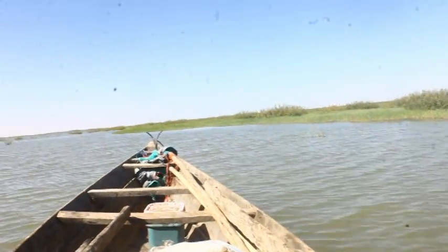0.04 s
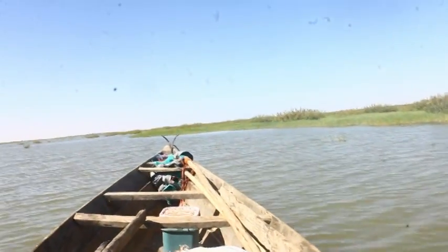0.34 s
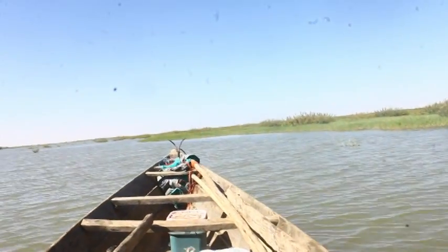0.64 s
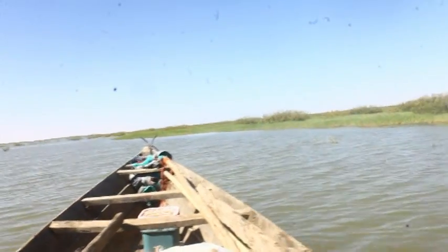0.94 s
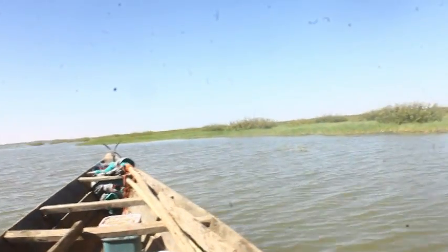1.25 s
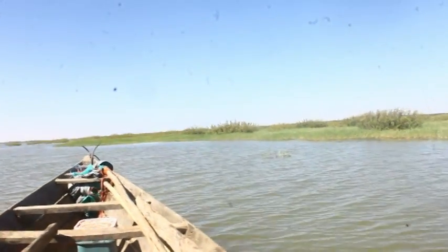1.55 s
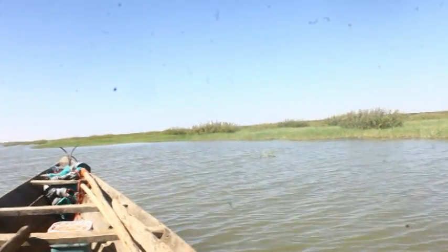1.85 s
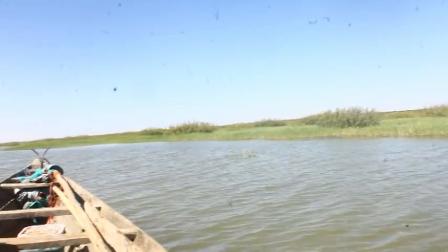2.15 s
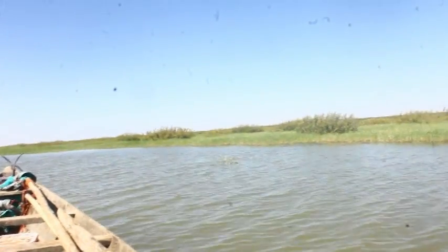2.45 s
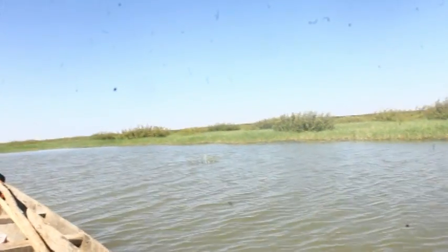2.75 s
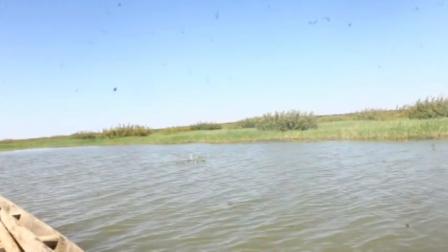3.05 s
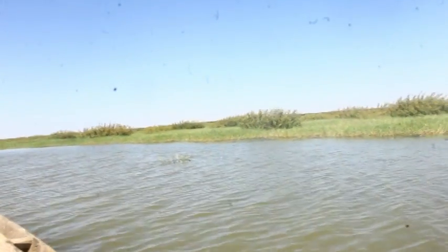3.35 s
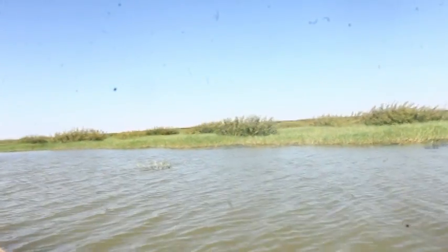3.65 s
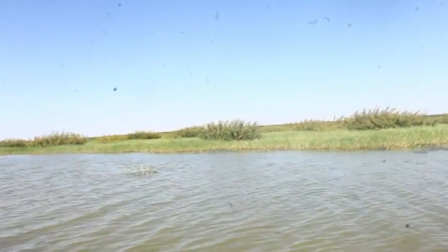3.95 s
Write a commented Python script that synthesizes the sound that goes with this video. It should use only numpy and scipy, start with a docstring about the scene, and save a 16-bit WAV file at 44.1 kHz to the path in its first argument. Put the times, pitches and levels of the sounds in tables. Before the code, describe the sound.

Wind gusts buffet the microphone with sharp knocks, over lapping water and faint birds.

```python
"""Wind gusts buffet a microphone in a wooden boat on a wide river and overload it in sharp knocks.
Turbulence sweeping past the microphone rumbles, and single eddies thump, crack and snap against it.
Between the gusts ripples slap and swish along the hull and bubbles ring over the wash of open water.
Far birds whistle, swoop and peep in gliding tones; these and a rasp are scattered by the reeds."""
import sys
import numpy as np
from scipy import signal
from scipy.fft import rfft, irfft
from scipy.io import wavfile
from scipy.ndimage import map_coordinates

SR = 44100
rng = np.random.default_rng(int(sys.argv[2]) if len(sys.argv) > 2 else 0)


def waveform_to_disk(signal):
    """Save audio, clipped to [-1, 1], as 16-bit WAV at the path in sys.argv[1]."""
    frames = np.transpose(np.atleast_2d(signal))
    scaled = np.clip(frames, -1, 1) * 32767
    samples = np.round(scaled).astype(np.int16)
    wavfile.write(sys.argv[1], SR, samples)


N = 176400
T = np.arange(N) / SR

# pressure spectrum of turbulence: (frequency [Hz], relative density [dB])
TURBULENCE_SPECTRUM = [(15, -27), (30, -18), (60, -7), (110, 1.5), (200, -0.5), (320, -8), (480, -10.5),
                       (700, -22.5), (1000, -30), (2000, -56), (4000, -67), (9000, -88)]
# spectrum of the crack in an eddy's core: (frequency [Hz], relative density [dB])
CRACK_SPECTRUM = [(200, -14.5), (500, 18.5), (900, 3.5), (1500, -8.5), (3000, -29), (6000, -39.5),
                  (15000, -48.5)]


def amp(db):
    """Amplitude ratio of a level in decibels."""
    return 10 ** (np.asarray(db) / 20)


def unit(x):
    """Normalisation to rms 1."""
    return x / np.sqrt(np.mean(x ** 2) + 1e-20)


def gain_at(spectrum, hz):
    """Gain of a spectrum, interpolated in decibels over log frequency."""
    f, db = np.transpose(spectrum)
    return amp(np.interp(np.log(hz + 1), np.log(f + 1), db))


def noise(gain, size=N):
    """Spectral shaping: white noise weighted by gain(frequency), at rms 1."""
    return unit(irfft(rfft(rng.standard_normal(size)) * gain(np.fft.rfftfreq(size, 1 / SR)), size))


def drift(hz, size=N):
    """Random modulation: noise low-passed at hz."""
    return noise(lambda f: 1 / (1 + (f / hz) ** 4), size)


def band(f, hz, octaves):
    """Gaussian passband over log frequency."""
    return np.exp(-.5 * (np.log2((f + 1) / hz) / octaves) ** 2)


def add(mix, start, sound):
    """Superposition of a sound on the mix from a start time in seconds."""
    at = round(start * SR)
    sound = sound[max(-at, 0):]
    part = mix[max(at, 0):][:len(sound)]
    part += sound[:len(part)]


def gate(start, end, rise_s=.00505, fall_s=.009):
    """Sustained envelope with exponential flanks."""
    return np.exp(-np.maximum(start - T, 0) / rise_s - np.maximum(T - end, 0) / fall_s)


def ring_down(t, decay_s, rise_s=.00053):
    """Transient envelope: a quick onset, then exponential damping."""
    return (1 - np.exp(-t / rise_s)) * np.exp(-t / decay_s)


def wind():
    """Convected turbulence: a stronger gust sweeps eddies past faster, and its strongest lumps crackle."""
    # stretches of turbulent wind: (start [s], end [s], level [dB])
    gusts = [(0, 0.027, -17), (.03, 0.264, -21), (.255, 0.311, -27), (0.347, .40, -27.5),
             (0.413, 0.514, -21), (0.546, .68, -32.5), (0.684, 0.905, -21.5), (.91, 1.333, -24),
             (1.448, 1.583, -38.5), (1.632, 1.68, -26), (1.685, 1.79, -17), (1.812, 1.88, -19),
             (1.868, 1.926, -32), (2.019, 2.1, -29.5), (2.1, 2.153, -22.5), (2.213, 2.241, -29),
             (2.316, 2.366, -22), (2.41, 2.419, -28.5), (2.524, 2.56, -30.5), (2.904, 2.963, -40),
             (3.016, 3.06, -16), (3.114, 3.15, -36.5), (3.155, 3.163, -22), (3.36, 3.677, -39.5),
             (3.861, 3.989, -38.5), (3.992, 4.021, -21)]
    lull_db, lump_db, sputter_db = -45.5, 3.6, -41.5
    gust = np.max([amp(db) * gate(start, end) for start, end, db in gusts], 0) + amp(lull_db)
    lumps = unit(amp(lump_db * np.clip(drift(hz=60), -2.5, 1.5)))
    force = gust * lumps
    speed = (unit(force) + .11) ** .08
    eddies = noise(lambda f: gain_at(TURBULENCE_SPECTRUM, f))
    rumble = force * map_coordinates(eddies, [np.cumsum(speed)], order=3, mode="wrap")
    sputter = amp(sputter_db) * unit(force ** 2.3) * noise(lambda f: gain_at(CRACK_SPECTRUM, f))
    return rumble + sputter


def river():
    """Open water: a broadband wash and a Poisson rain of tiny drops, each a damped oscillator."""
    # spectrum of the wash: (frequency [Hz], relative density [dB])
    wash_spectrum = [(20, -9.5), (150, 9), (400, -3.5), (900, -9.5), (1600, -12.5), (3000, -19),
                     (5000, -23), (8000, -28.5), (10500, -36), (15500, -38.5)]
    # strength of the drops by pitch: (frequency [Hz], relative level [dB])
    drop_spectrum = [(700, -8.5), (1800, 0), (4500, -6), (8000, -13), (14000, -17.5)]
    drops_per_s, spread_db, decay_cycles = 300, 5, 2.5
    wash_db, swell_db, drops_db = -46.5, .8, -57.5
    drops, t = np.zeros(N), np.arange(1024) / SR
    pitches = np.geomspace(800, 13000, num=24)
    for hz in pitches:
        hits = rng.random(N) < drops_per_s / len(pitches) / SR
        strength = amp(spread_db * np.minimum(rng.exponential(1, N), 3.5))
        ring = np.sin(2 * np.pi * hz * t) * np.exp(-t * hz / decay_cycles)
        drops += gain_at(drop_spectrum, hz) * signal.oaconvolve(hits * strength, ring)[:N]
    wash = noise(lambda f: gain_at(wash_spectrum, f)) * amp(wash_db - swell_db * drift(hz=22))
    return wash + amp(drops_db) * unit(drops)


def buffets():
    """Pressure pulses: each eddy is a swing or two, quickest at its core, where it cracks."""
    # eddies striking the microphone:
    # (time [s], relative level [dB], nominal length [s], nominal pitch [Hz], relative crack level [dB])
    eddies = [(0.042, -7, 0.0034, 234.2, -33), (0.058, -1.5, 0.0054, 264.1, -30),
              (0.117, -15.5, 0.013, 340.5, -27.5), (0.14, -7.5, 0.0063, 259.5, -37),
              (0.165, -8.5, 0.0045, 215.7, -56.5), (0.186, -4.5, 0.005, 320.1, -25.5),
              (0.203, -8, 0.0022, 362, -52), (0.228, -7, 0.0045, 372.2, -29),
              (0.407, -23, 0.006, 330.7, -47), (0.425, -7.5, 0.0047, 265.2, -28.5),
              (0.448, -12, 0.006, 288, -40), (0.53, -9, 0.0049, 385.4, -30.5),
              (0.72, -7.5, 0.0032, 276, -33), (0.737, -8.5, 0.0058, 321.9, -24.5),
              (0.763, -14, 0.0045, 378.5, -31), (0.831, -18, 0.0047, 257, -42.5),
              (0.837, -9.5, 0.0033, 254.3, -42), (0.884, -7.5, 0.0033, 256, -65),
              (0.896, -12, 0.0045, 308.6, -47), (0.954, -18, 0.0051, 291.5, -37),
              (0.977, -7.5, 0.0026, 254.3, -49), (1.004, -8.5, 0.0041, 250, -37),
              (1.041, -11.5, 0.0047, 393.5, -30), (1.073, -13, 0.0029, 246, -40.5),
              (1.092, -11, 0.0049, 341, -33), (1.113, -16, 0.0052, 246.6, -48),
              (1.168, -12.5, 0.005, 233, -32.5), (1.18, -12.5, 0.005, 344.4, -36),
              (1.202, -11, 0.0039, 250, -58), (1.241, -18, 0.006, 200, -58),
              (1.268, -22, 0.0039, 152.5, -49), (1.313, -10.5, 0.0036, 335, -44),
              (1.331, -13, 0.0052, 214, -54), (1.477, -16.5, 0.0037, 301.3, -38),
              (1.521, -18.5, 0.0027, 261, -62), (1.568, -22.5, 0.0029, 327.3, -40.5),
              (1.655, -18.5, 0.0068, 220, -33.5), (1.689, -9.5, 0.004, 246, -35.5),
              (1.73, -6, 0.0038, 305.2, -26.5), (1.764, -16, 0.0041, 485, -45),
              (1.782, -9, 0.0065, 260, -30), (1.836, -5, 0.0039, 280.7, -32),
              (1.874, -14, 0.0048, 255.6, -44), (2.063, -10, 0.0027, 322.6, -53),
              (2.124, -5, 0.0034, 419.1, -20), (2.143, -10.5, 0.0038, 220.6, -51),
              (2.217, -7.5, 0.0036, 288.6, -34), (2.224, -10, 0.0033, 359, -37),
              (2.24, -18.5, 0.0039, 332.7, -36), (2.331, -12.5, 0.0032, 273, -32.5),
              (2.367, -19, 0.0055, 277.6, -47.5), (2.533, -11, 0.0038, 222.8, -50),
              (2.544, -12.5, 0.0028, 254.3, -38), (2.554, -15, 0.0031, 314, -31),
              (2.592, -10.5, 0.0027, 390.6, -45), (2.813, -24.5, 0.0037, 233.7, -59),
              (3.025, -11, 0.0052, 221.4, -60), (3.054, -4, 0.0058, 414.1, -18.5),
              (3.066, -23, 0.008, 546, -29.5), (3.162, -9, 0.0047, 292, -42),
              (3.259, -25, 0.0043, 448.7, -48), (3.484, -23.5, 0.0022, 396, -44),
              (3.51, -31.5, 0.0031, 383, -44), (3.612, -26, 0.0072, 400.6, -47),
              (3.681, -21.5, 0.0024, 298, -46), (3.874, -21.5, 0.0033, 339, -56),
              (3.912, -19, 0.0064, 294.8, -39.5)]
    roughness, crack_width_s = .6, .00091
    out, t = np.zeros(N), np.arange(-2048, 2048) / SR
    core = np.exp(-.5 * (t / crack_width_s) ** 2)
    core_rms = np.sqrt(np.mean(core ** 2))
    for time, db, length, hz, crack_db in eddies:
        envelope = 1 / np.cosh(np.clip(t / (.439 * length), -20, 20))
        pitch = hz * (1 + .5 * (envelope ** 2 - .7))
        cycles = np.cumsum(pitch) / SR + rng.random()
        turbulence = noise(lambda f: gain_at(TURBULENCE_SPECTRUM, f), len(t))
        swing = np.sqrt(2) * np.sin(2 * np.pi * cycles) + roughness * turbulence
        crack = core_rms * unit(core * noise(lambda f: gain_at(CRACK_SPECTRUM, f), len(t)))
        add(out, time + t[0], amp(db + 1.5) * envelope * swing + amp(crack_db + 17) * crack)
    # the microphone port sheds the slowest pressure swings
    return signal.sosfilt(signal.butter(2, 60, "highpass", fs=SR, output="sos"), out)


def snaps():
    """Impulses: the hardest eddies break in one pressure spike, with all frequencies in phase."""
    # breaking eddies: (time [s], peak level [dB])
    breaks = [(.0575, -32), (.186, -19), (.738, -18), (1.0415, -30), (2.124, -18), (3.054, -22)]
    # spectrum of the spike: (frequency [Hz], relative density [dB])
    spectrum = [(500, -20.5), (1500, -2), (3000, -5.5), (6000, -9.5), (10000, -13), (15500, -36)]
    out, size = np.zeros(N), 256
    spike = np.roll(irfft(gain_at(spectrum, np.fft.rfftfreq(size, 1 / SR))), size // 2)
    for time, db in breaks:
        add(out, time - size / 2 / SR, amp(db) * spike / spike.max())
    return out


def bird_note(hz, db, waver_depth=.005, flutter_db=2.5):
    """A pure tone on a pitch contour, with slight random frequency and amplitude modulation."""
    waver = 1 + waver_depth * drift(hz=150, size=16384)[:len(hz)]
    flutter = flutter_db * drift(hz=70, size=16384)[:len(hz)]
    envelope = np.sqrt(2 * abs(np.sin(np.linspace(0, np.pi, len(hz)))))
    return amp(db + flutter) * envelope * np.sin(2 * np.pi * np.cumsum(hz * waver) / SR)


def whistles():
    """Frequency modulation: thin bird whistles with vibrato hold, climb as they swell, then drop."""
    # calls: (start [s], length [s], low pitch [Hz], top pitch [Hz], mid-climb [fraction], level [dB])
    calls = [(0.128, 0.19, 7950, 8730, 0.63, -65.5), (0.411, 0.26, 7420, 8800, 0.41, -62),
             (0.916, 0.23, 7900, 9070, 0.57, -59), (1.125, 0.18, 7950, 9300, 0.84, -62),
             (1.579, 0.16, 7370, 8550, .52, -56.5), (3.671, 0.23, 7300, 9030, 0.33, -65)]
    climb_share, swell_db, drop_s, drop_hz = .15, 4.5, .033, 1670
    vibrato_depth_hz, vibrato_rate_hz = 90, 11
    out = np.zeros(N)
    for start, length, low, top, mid_climb, db in calls:
        progress = np.linspace(0, 1, round(length * SR))
        climb = .5 + .5 * np.tanh((progress - mid_climb) / climb_share)
        drop = np.maximum(1 - (1 - progress) * length / drop_s, 0) ** 2
        vibrato = vibrato_depth_hz * np.sin(2 * np.pi * vibrato_rate_hz * (progress - mid_climb) * length)
        pitch = low + (top - low) * climb + vibrato - drop_hz * drop
        add(out, start, bird_note(pitch, db + swell_db * (climb - 1)))
    return out


def swoops():
    """Exponential sweeps: quick bird chirps, nearly all falling."""
    # chirps: (start [s], length [s], first pitch [Hz], last pitch [Hz], level [dB])
    chirps = [(0.233, 0.032, 6330, 4770, -54), (0.249, 0.022, 4140, 3350, -53.5),
              (0.507, 0.043, 7000, 4420, -49.5), (0.523, 0.047, 6400, 4090, -51),
              (.755, 0.1, 7170, 3680, -56), (0.793, 0.053, 6750, 4000, -50),
              (1.135, 0.022, 7150, 5130, -65), (1.177, 0.023, 5900, 4100, -60.5),
              (1.222, 0.044, 4966, 3880, -57.5), (1.572, 0.039, 4700, 6080, -57),
              (1.623, 0.041, 6370, 3770, -56), (1.741, 0.019, 8700, 6700, -54),
              (1.927, 0.031, 6250, 5260, -57.5), (1.984, .025, 6200, 4970, -65),
              (2.491, .115, 7560, 3320, -52.5), (3.448, 0.069, 7240, 4110, -55.5),
              (3.476, 0.044, 6550, 4653, -64), (3.663, 0.043, 6510, 5140, -64),
              (3.882, 0.027, 7040, 3900, -52), (3.892, 0.045, 6700, 3780, -55)]
    out = np.zeros(N)
    for start, length, first, last, db in chirps:
        progress = np.linspace(0, 1, round(length * SR))
        pitch = first * (last / first) ** progress
        add(out, start, bird_note(pitch, db) * np.sin(np.pi * progress))
    return out


def plops():
    """Bubble resonance: each bubble at the hull rings as a damped sine, rising very slightly."""
    # bubbles: (time [s], peak level [dB], pitch [Hz], decay time [s])
    bubbles = [(.278, -40.5, 2110, .002), (0.652, -31, 2033, 0.0045), (.848, -17, 1301, 0.00071),
               (2.032, -30, 1214, 0.0044), (2.674, -29, 2030, 0.0013), (3.208, -32.5, 1250, 0.0067),
               (3.553, -35.5, 2210, 0.0012), (3.647, -29.5, 1212, 0.001), (3.838, -33.5, 1663, 0.0019)]
    out, t = np.zeros(N), np.arange(4096) / SR
    for time, db, hz, decay_s in bubbles:
        envelope = ring_down(t, decay_s)
        tone = np.sin(2 * np.pi * hz * t * (1 + .67 * t))
        add(out, time, amp(db) * envelope / envelope.max() * tone)
    return out


def swishes():
    """Amplitude-modulated band noise: passing ripples swell and fade softly."""
    # passing ripples: (middle [s], Gaussian width [s], centre frequency [Hz], level [dB])
    ripples = [(0.334, 0.018, 1500, -43.5), (0.562, 0.026, 1400, -47), (0.615, 0.015, 6500, -57.5),
               (1.455, 0.024, 4000, -60), (3.565, 0.067, 1800, -55.5)]
    out = np.zeros(N)
    for middle, width, hz, db in ripples:
        envelope = np.exp(-.5 * ((T - middle) / width) ** 2)
        out += amp(db) * envelope * noise(lambda f: band(f, hz, octaves=.57))
    return out


def slaps():
    """Impact noise: a ripple hits the hull in a damped burst of band noise with faint broadband spray."""
    # impacts: (time [s], relative level [dB], decay time [s], centre frequency [Hz])
    impacts = [(0.359, -45, 0.0049, 5500), (0.652, -45.5, 0.011, 3960), (1.400, -31.5, 0.0045, 2142),
               (1.468, -38, 0.019, 2380), (1.539, -33.5, 0.0062, 2080), (1.849, -33.5, 0.0055, 2370),
               (2.336, -28, 0.0052, 2600), (2.355, -29.5, 0.0025, 3000), (2.4, -39, 0.0069, 3020),
               (2.725, -38, 0.0073, 2340), (2.82, -31.5, 0.0044, 2167), (3.168, -20, 0.0034, 2250),
               (3.258, -21.5, 0.0065, 1590), (3.284, -28, 0.0086, 1200), (3.515, -25, 0.0015, 990),
               (3.523, -29, 0.0013, 2200), (3.530, -32, 0.0025, 2000), (3.562, -39.5, 0.0043, 4140),
               (3.585, -30.5, 0.0099, 605), (3.599, -39.5, 0.01, 2150), (3.835, -26, 0.0044, 546),
               (3.979, -15, 0.0029, 554.8)]
    spray_db, spray_top_hz = -23, 8000
    out, t = np.zeros(N), np.arange(4096) / SR
    for time, db, decay_s, hz in impacts:
        splash = noise(
            lambda f: band(f, hz, octaves=.69) + amp(spray_db) / (1 + (f / spray_top_hz) ** 2), len(t))
        add(out, time, .5 * amp(db) * ring_down(t, decay_s) * splash)
    return out


def rasps():
    """Narrow-band noise: a far rasp from the reeds."""
    # stretches of rasping: (start [s], end [s], centre frequency [Hz], level [dB])
    stretches = [(2.38, 2.555, 1790, -52.5), (2.6, 2.951, 1550, -58)]
    return sum(amp(db) * gate(start, end) * noise(lambda f: band(f, hz, octaves=.16))
               for start, end, hz, db in stretches)


def peeps(start_s=2.415, period_s=.222, length_s=.03):
    """Linear sweeps: a bird gives five evenly spaced rising peeps."""
    out = np.zeros(N)
    pitch_hz = np.linspace(2450, 2780, round(length_s * SR))
    for k in range(5):
        add(out, start_s + k * period_s, bird_note(pitch_hz, db=-53.5))
    return out


def reed_scatter(calls, echo_db=-10, t60_s=.12):
    """Diffuse scattering: the reeds add a short, exponentially decaying tail to the direct sound."""
    tail = rng.standard_normal(SR // 2) * np.exp(-np.log(1000) * T[:SR // 2] / t60_s)
    return calls + amp(echo_db) * signal.oaconvolve(calls, tail / np.linalg.norm(tail))[:N]


def scene():
    """Superposition of wind, water and birds in one channel."""
    air = buffets() + wind() + snaps()
    water = river() + plops() + swishes() + slaps()
    birds = reed_scatter(whistles() + swoops() + rasps() + peeps())
    return (air + water + birds)[None]


def record(dry, ceiling=.72, knee=12, cutoff_hz=15850):
    """Saturation: the strongest buffets overload the input; a low-pass then limits the bandwidth."""
    clipped = dry / (1 + abs(dry / ceiling) ** knee) ** (1 / knee)
    low_pass = signal.firwin(511, cutoff_hz, window=("kaiser", 9), fs=SR)
    return signal.oaconvolve(clipped, low_pass[None], "same")


dry = scene()
out = record(dry)
waveform_to_disk(out)
```